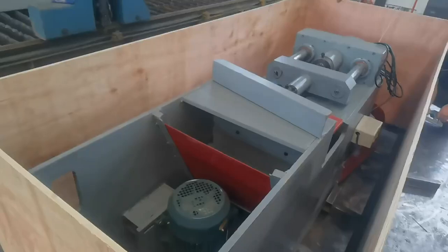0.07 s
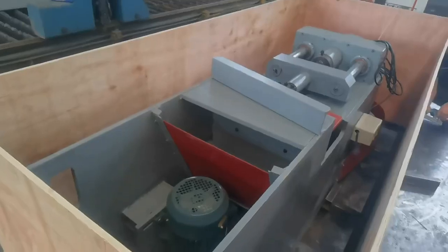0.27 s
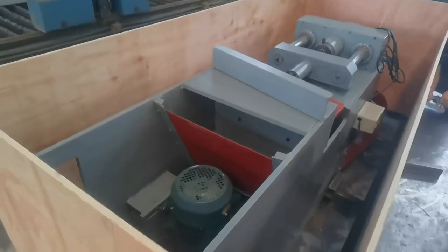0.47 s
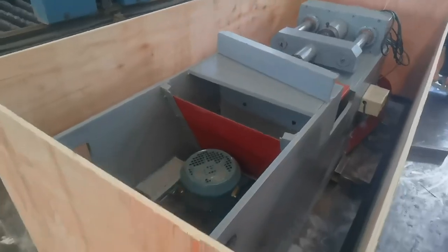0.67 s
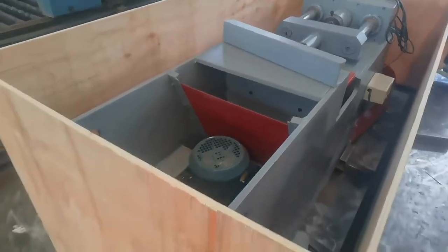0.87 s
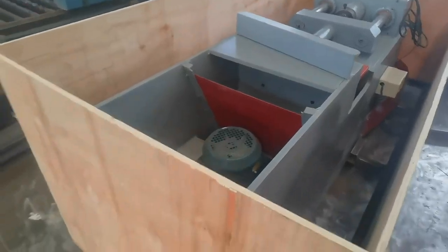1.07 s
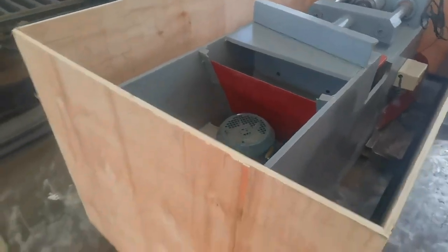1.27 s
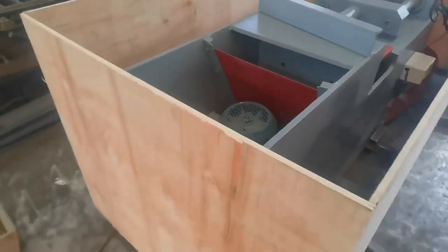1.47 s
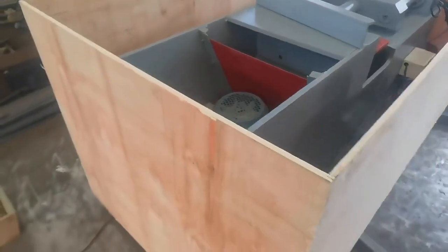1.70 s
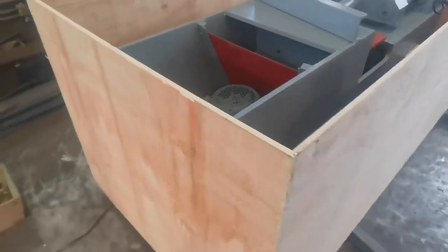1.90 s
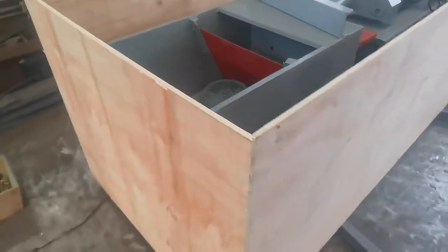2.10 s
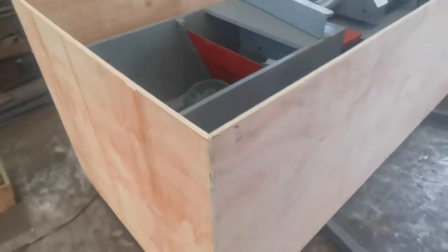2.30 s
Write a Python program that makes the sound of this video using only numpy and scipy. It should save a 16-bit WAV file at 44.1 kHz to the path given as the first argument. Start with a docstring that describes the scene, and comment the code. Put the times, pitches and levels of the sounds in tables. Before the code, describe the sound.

An air nailer fires two nails into a plywood crate in a humming workshop.

```python
"""A workshop's rumble comes in loud and settles as an air nailer fires the first of two nails into a
plywood crate. Each shot is a valve click, the crack of the steel driver and the bang of the board,
whose modes ring on. A moment later the spent air vents with a thump and a bright turbulent puff, and
the piston knocks home. The hall reverberates over its hum, soft low bumps and a far machine's whine."""
import sys
import numpy as np
from scipy import signal
from scipy.fft import rfft, irfft
from scipy.io import wavfile

SR = 44100
rng = np.random.default_rng(int(sys.argv[2]) if len(sys.argv) > 2 else 0)


def generate_wav(signal):
    """Clip the signal to [-1, 1] and save it as 16-bit WAV at the path in sys.argv[1]."""
    frames = np.transpose(np.atleast_2d(signal))
    scaled = np.clip(frames, -1, 1) * 32767
    pcm = np.round(scaled).astype(np.int16)
    wavfile.write(sys.argv[1], SR, pcm)


N = 108045
T = np.arange(N) / SR
BIN_HZ = np.fft.rfftfreq(N, 1 / SR)


def amp(db):
    """Amplitude grows tenfold with every 20 dB."""
    return 10 ** (np.asarray(db) / 20)


def unit_rms(x):
    """Normalisation to a mean power of 1."""
    return x / np.sqrt(np.mean(x ** 2) + 1e-20)


def at_frequency(points, hz):
    """Interpolation of a table on a logarithmic frequency axis."""
    points_hz, values = np.transpose(points)
    return np.interp(np.log(hz + 1), np.log(points_hz + 1), values)


def level_curve(points):
    """A gain that moves linearly in decibels between points in time."""
    return amp(np.interp(T, *np.transpose(points)))


def noise(colour):
    """Spectral shaping of white noise; the result has rms 1."""
    return unit_rms(irfft(rfft(rng.standard_normal(N)) * amp(at_frequency(colour, BIN_HZ)), N))


def drift(rate_hz):
    """Random fluctuation of rms 1: noise low-passed at rate_hz."""
    return unit_rms(irfft(rfft(rng.standard_normal(N)) / (1 + (BIN_HZ / rate_hz) ** 4), N))


def flutter(rate_hz, depth_db):
    """Random amplitude modulation: a waver when slow, a rattle when fast."""
    return unit_rms(amp(depth_db * np.clip(drift(rate_hz), -2, 2)))


def tone(hz, waver_hz):
    """Random frequency modulation makes a sine of rms 1 slightly unsteady."""
    cycles = rng.random() + np.cumsum(hz + waver_hz * drift(rate_hz=15.8)) / SR
    return np.sqrt(2) * np.sin(2 * np.pi * cycles)


def burst(peak_s, rise_s, fall_s, hold_s=0):
    """A transient's envelope: exponential growth, an optional hold, exponential decay."""
    return np.exp(np.minimum(T - peak_s, 0) / rise_s - np.maximum(T - peak_s - hold_s, 0) / fall_s)


def air_pulse(start_s, hz, rise_s):
    """Displaced air makes a few low, heavily damped cycles of pressure."""
    t = np.maximum(T - start_s, 0)
    return (t / rise_s * np.exp(1 - t / rise_s)) ** 2 * np.sin(2 * np.pi * hz * t)


def shot_colour(table, shot):
    """The point of impact sets the spectrum, and each nail goes in at another place."""
    return [(hz, db[shot]) for hz, *db in table]


def room(x, near_db, hall_db):
    """Reverberation: sparse early reflections and the hall's diffuse field follow the direct sound."""
    # reverberation time of the hall: frequency_hz, t60_s
    hall_decay = [(80, 0.44), (250, 0.58), (1000, 0.53), (3000, 0.79), (6000, 0.75), (9000, 0.63),
                  (13000, 0.47)]
    gap_s, near_t60_s, reflections_per_s, build_s = 0.0043, 0.22, 3000, 0.09
    wall_delay_s, wall_spread_s, wall_db = 0.12, 0.018, -15
    t = T[:SR]
    onset = np.clip(t / gap_s - 1, 0, 1)
    reflections = rng.choice([-1, 1], SR) * (rng.random(SR) < reflections_per_s / SR)
    near = reflections * onset * amp(-60 * t / near_t60_s)
    hz, frame_s, spectra = signal.stft(rng.standard_normal(SR), SR, nperseg=256)
    age_s = np.hypot(frame_s, build_s) - build_s  # the hall fills before it dies away
    decay = amp(-60 * age_s / at_frequency(hall_decay, hz)[:, None])
    hall = signal.istft(spectra * decay, SR, nperseg=256)[1][:SR] * onset
    hall *= 1 + amp(wall_db) * np.exp(-((t - wall_delay_s) / wall_spread_s) ** 2)  # far wall's echoes
    response = amp(near_db) * near / np.linalg.norm(near) + amp(hall_db) * hall / np.linalg.norm(hall)
    return x + signal.fftconvolve(x, response)[:N]


def workshop():
    """Ambient noise: broadband rumble, with a tonal hum and a far machine's whine that comes and goes."""
    # spectrum of the rumble: frequency_hz, relative_db
    rumble_colour = [(15, -56), (25, -33), (37, -20), (57, -11.5), (87, 1), (173, -3.5), (197, -5),
                     (250, -2), (363, -3), (392, -8), (498, -6), (569, -12), (616, -8), (846, -9.5),
                     (916, -7.5), (991, -6), (1400, -18), (3260, -19.5), (14000, -35.5)]
    # partials of the hum: pitch_hz, level_db
    hum_partials = [(91, -59), (261, -59.5), (611, -66.5)]
    # swells of the whine: time_s, level_db
    whine_levels = [(0.19, -50), (0.3, -48), (0.5, -53.5), (0.62, -61.5), (0.68, -52), (0.77, -61),
                    (0.87, -50), (1.2, -52), (1.33, -56), (1.8, -67), (2.0, -61), (2.18, -59), (2.25, -51),
                    (2.32, -49.5), (2.36, -56), (2.45, -64)]
    # gain on all three, loud until the first shot: time_s, gain_db
    overall_gain = [(0.19, 14), (0.235, 15.5), (0.28, -9.5), (0.45, -1), (0.8, -0.5), (1.3, -0.5), (1.9, 1),
                    (2.3, 1), (2.45, 3)]
    rumble = amp(-49.5) * noise(rumble_colour) * flutter(rate_hz=4.6, depth_db=0.72)
    hum = sum(amp(db) * tone(hz, waver_hz=7.78) * flutter(rate_hz=16, depth_db=4.5)
              for hz, db in hum_partials)
    whine = level_curve(whine_levels) * tone(hz=915, waver_hz=2.4) * flutter(rate_hz=16, depth_db=-3)
    return level_curve(overall_gain) * (rumble + hum + whine)


def bumps():
    """Damped low-frequency pulses are heard as soft bumps somewhere in the hall."""
    # bumps: start_s, level_db
    pulses = [(0.771, -44), (1.176, -46), (1.69, -47), (2.052, -40)]
    return sum(amp(db) * air_pulse(s, hz=91, rise_s=0.0095) for s, db in pulses)


def valve():
    """Brief contacts are broadband: the valve clicks open before each shot and snaps back after it."""
    # valve clicks: peak_s, level_db
    clicks = [(0.232, -21), (0.237, -19), (0.406, -28), (0.408, -31), (1.341, -27.5), (1.345, -35),
              (1.359, -30), (1.509, -22), (1.516, -21)]
    # spectrum of a click: frequency_hz, relative_db
    click_colour = [(300, -43), (2500, -5.5), (5000, 1), (8000, -1), (11000, 7), (14000, 10)]
    envelope = sum(amp(db) * burst(s, rise_s=0.0011, fall_s=0.0032) for s, db in clicks)
    return room(envelope * noise(click_colour), near_db=-9, hall_db=-13)


def piston():
    """A damped impact: the returning piston knocks home at the end of each puff."""
    # piston knocks: peak_s, level_db
    knocks = [(0.416, -35), (1.522, -31)]
    # spectrum of a knock: frequency_hz, relative_db
    knock_colour = [(330, -19), (520, -2), (720, 0), (1000, -16), (2000, -25.5), (8000, -25)]
    envelope = sum(amp(db) * burst(s, rise_s=0.005, fall_s=0.01) for s, db in knocks)
    return room(envelope * noise(knock_colour), near_db=-5.5, hall_db=-9)


def exhaust():
    """Jet noise: the spent air leaves in one turbulent puff, and the air it displaces thumps."""
    # exhaust puffs: peak_s, hold_s, hiss_db, body_db, thump_db
    puffs = [(0.398, .011, -22.5, -33, -32), (1.505, .014, -22, -28, -27)]
    # spectrum of the hiss: frequency_hz, relative_db
    hiss_colour = [(500, -31), (7500, -28), (11500, 1), (14000, 1)]
    # spectrum of the puff's body: frequency_hz, relative_db
    body_colour = [(60, -4), (200, 11), (330, -1), (700, -18), (1200, -2.5), (1900, -11.5), (3100, -4.5),
                   (3800, 1), (4800, 0), (5800, 2.5), (7000, -1), (8700, 2.5), (10200, -6), (14000, -12.5)]
    rise_s, fall_s, thump_lead_s = 0.0014, 0.0036, 0.0078
    hiss, body, thump = np.zeros((3, N))
    for peak_s, hold_s, hiss_db, body_db, thump_db in puffs:
        jet = burst(peak_s, rise_s, fall_s, hold_s) * (T > peak_s - 2 * rise_s)
        hiss += amp(hiss_db) * jet
        body += amp(body_db) * jet
        thump += amp(thump_db) * air_pulse(peak_s - thump_lead_s, hz=98, rise_s=0.013)
    hiss = room(hiss * noise(hiss_colour), near_db=-4, hall_db=-1.5)
    body *= flutter(rate_hz=1450, depth_db=3) * noise(body_colour)
    return hiss + room(body, near_db=-0.5, hall_db=-3) + room(thump, near_db=-10, hall_db=-10)


def driver():
    """A hard impact is rich in treble: the steel driver slams against its stop and rattles."""
    # driver cracks: peak_s, level_db, rise_s, fall_s
    cracks = [(0.2463, -17, 0.0053, 0.0098), (1.3612, -16.5, 0.0031, 0.0035)]
    # spectra of the cracks: frequency_hz, first_shot_db, second_shot_db
    crack_colours = [(300, -15, -23), (2000, -10.5, -19), (3940, 0, -4), (5830, -1.5, -1.5), (6400, -3, -8),
                     (6720, 2, 8.5), (8040, -5.5, -6), (8900, -5, -5), (9550, -20, -25), (10570, 0.5, -27),
                     (11650, -10, -1), (12800, -12, -2.5), (14000, -16, -16)]
    crack = sum(amp(db) * burst(peak_s, rise_s, fall_s) * noise(shot_colour(crack_colours, shot))
                for shot, (peak_s, db, rise_s, fall_s) in enumerate(cracks))
    return room(crack * flutter(rate_hz=1300, depth_db=-1.9), near_db=-9, hall_db=-17)


def ringing(shot, peak_s, rise_s):
    """Free vibration: the normal modes swell with the blow, then each decays at its own rate."""
    # modes of board and tool: pitch_hz, t60_s, first_shot_db, second_shot_db
    modes = [(1027, 0.14, -27, -41), (1253, 0.069, -28, -26.5), (1650, 0.13, -44, -34),
             (1816, 0.12, -49, -32.5), (2141, 0.11, -26.5, -38.5), (2769, 0.13, -30, -43),
             (2880, 0.15, -35, -33), (2815, 0.086, -31, -27.5), (2850, 0.066, -20, -31),
             (3550, 0.12, -47, -40), (4170, 0.054, -28, -46), (4602, 0.065, -38, -26.5),
             (6768, 0.083, -26, -56), (7090, .04, -45, -18)]
    ring = np.zeros(N)
    sounding = (T > peak_s - 0.05) & (T < peak_s + 0.35)
    t = T[sounding] - peak_s
    for hz, t60_s, *mode_db in modes:
        envelope = amp(mode_db[shot] - 60 * np.maximum(t, 0) / t60_s)
        ring[sounding] += envelope * np.sin(2 * np.pi * (hz * t + rng.random()))
    return ring * np.exp(np.minimum(T - peak_s, 0) / rise_s)


def board():
    """Impact excitation: the nail tears into the plywood, which thuds and rings; the crate booms after."""
    # blows on the board: peak_s, bang_db, rise_s, fall_s, thud_db, boom_db
    blows = [(0.256, -16.5, 0.0042, 0.0056, -28.5, -41.5), (1.361, -21, 0.0034, 0.018, -61, -33.5)]
    # spectra of the bangs: frequency_hz, first_shot_db, second_shot_db
    bang_colours = [(60, -20, -33), (200, 0.5, -11), (516, -17, -1.5), (740, 8, -2), (1300, -1.5, 4),
                    (1560, 2, -3), (2090, -2.5, 5.5), (2520, -6, 1), (3000, -2, -1), (3500, -2.5, 7.5),
                    (4850, 1.5, -3.5), (5800, -8.5, -5), (8100, -9, -2), (10000, -24, -30),
                    (14300, -16, -3.5)]
    # spectrum of the whole crate's boom: frequency_hz, relative_db
    boom_colour = [(50, -30), (130, -7), (175, -5), (222, 2.5), (270, -13), (400, -14), (700, -17),
                   (2000, -20), (4000, -16), (9000, -23.5)]
    thud_lead_s, boom_lag_s = 0.03666, 0.041
    bang, thud, ring, boom = np.zeros((4, N))
    for shot, (peak_s, bang_db, rise_s, fall_s, thud_db, boom_db) in enumerate(blows):
        bang += amp(bang_db) * burst(peak_s, rise_s, fall_s) * noise(shot_colour(bang_colours, shot))
        thud += amp(thud_db) * air_pulse(peak_s - thud_lead_s, hz=103.7, rise_s=0.0093)
        ring += ringing(shot, peak_s, rise_s)
        boom += amp(boom_db) * burst(peak_s + boom_lag_s, rise_s=0.037, fall_s=0.15) * (T > peak_s)
    boom *= noise(boom_colour)
    bang *= flutter(rate_hz=1060, depth_db=2.5)
    return thud + ring + boom + room(bang, near_db=-3, hall_db=-10.5)


def scene():
    """Superposition: all sources add at one microphone, which feeds both channels."""
    mono = valve() + driver() + board() + piston() + exhaust() + workshop() + bumps()
    return np.array([mono, mono])


def record(dry):
    """Gating and band limiting: the sound switches on after a short silence and is low-passed."""
    start_s, fade_s, cutoff_hz = 0.193, 0.001, 14100
    gate = np.clip((T - start_s) / fade_s, 0, 1)
    lowpass = signal.firwin(401, cutoff_hz, window=("kaiser", 8), fs=SR)
    return signal.oaconvolve(dry * gate, lowpass[None], "same")


dry = scene()
out = record(dry)
generate_wav(out)
```